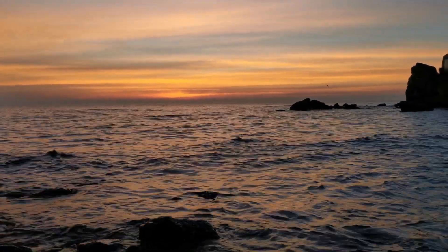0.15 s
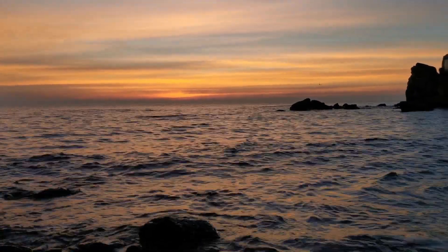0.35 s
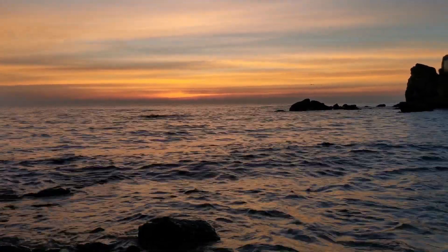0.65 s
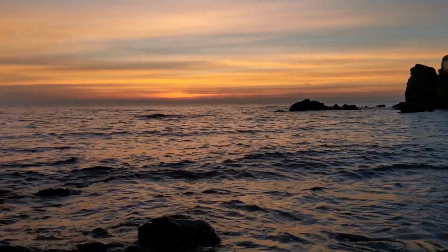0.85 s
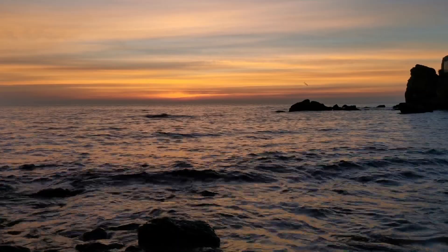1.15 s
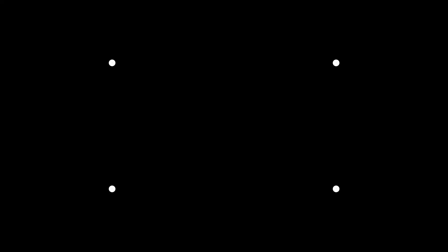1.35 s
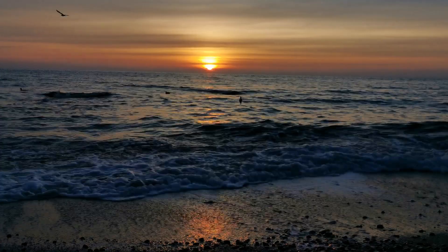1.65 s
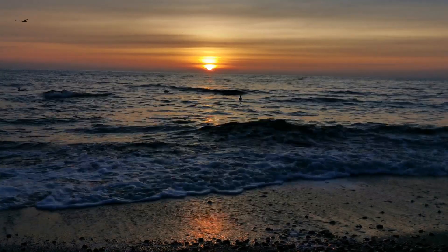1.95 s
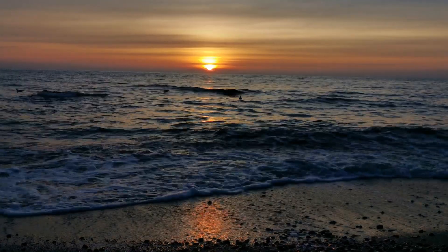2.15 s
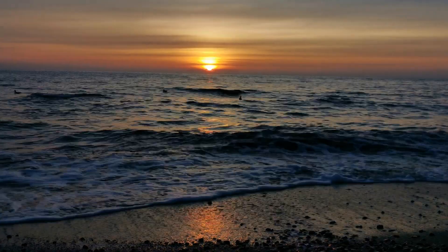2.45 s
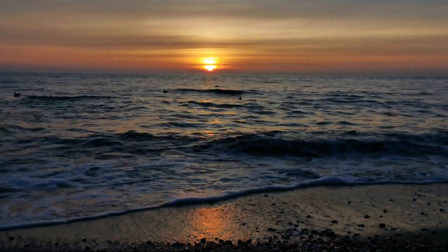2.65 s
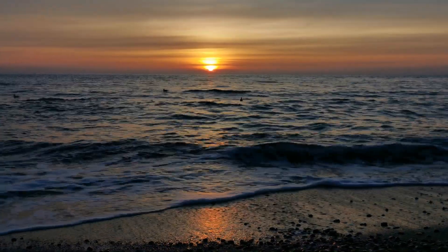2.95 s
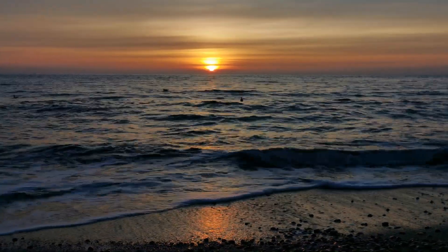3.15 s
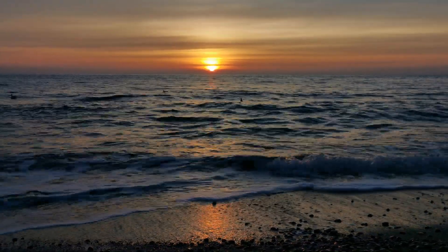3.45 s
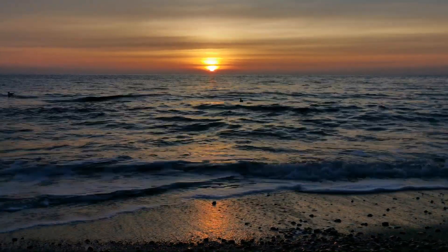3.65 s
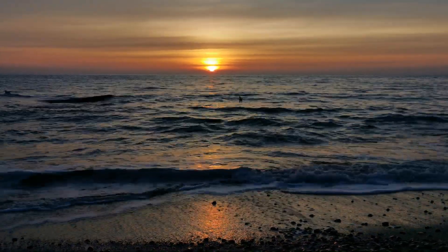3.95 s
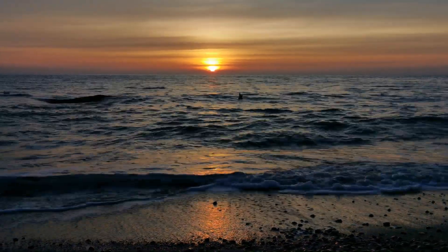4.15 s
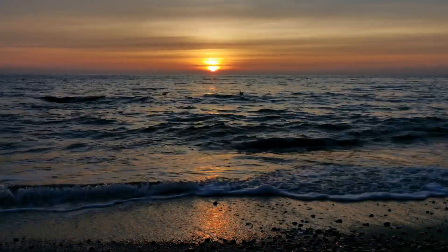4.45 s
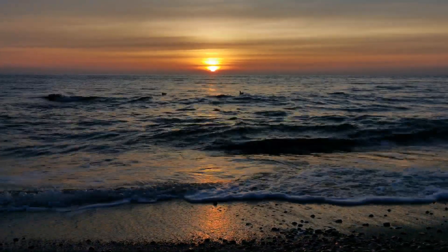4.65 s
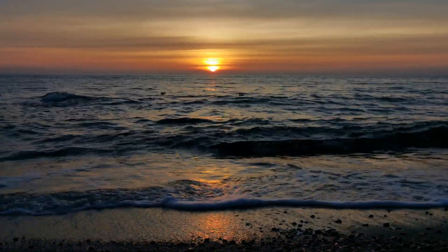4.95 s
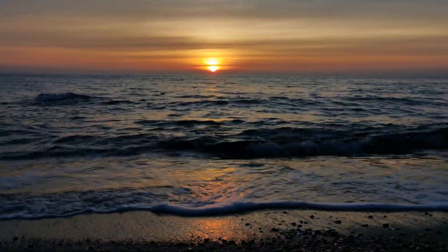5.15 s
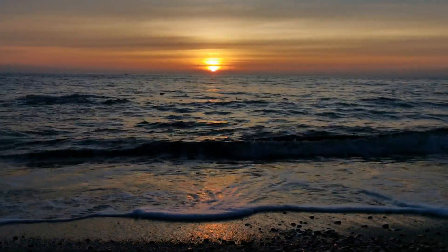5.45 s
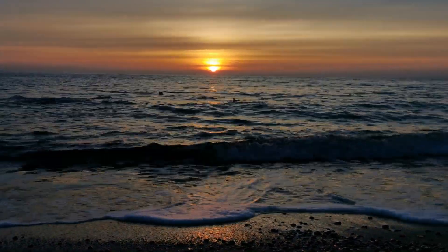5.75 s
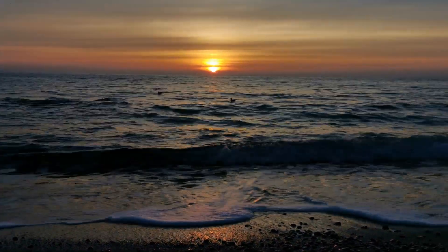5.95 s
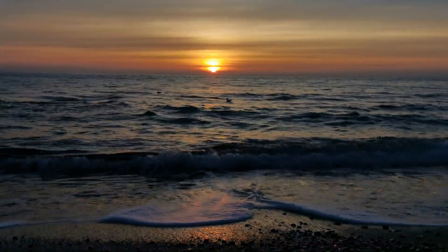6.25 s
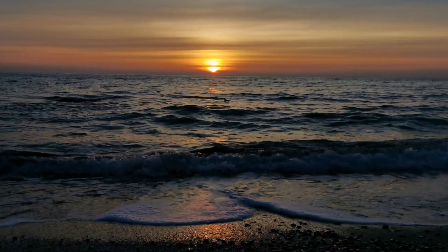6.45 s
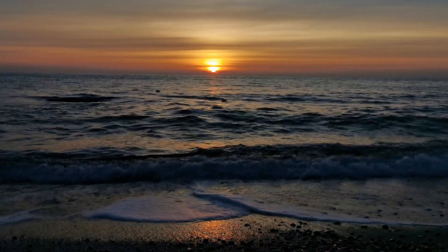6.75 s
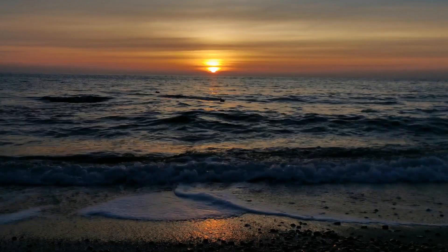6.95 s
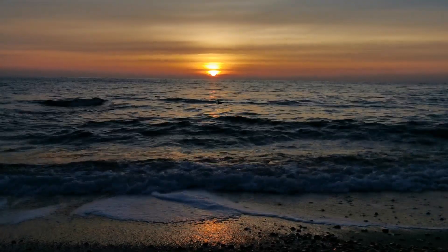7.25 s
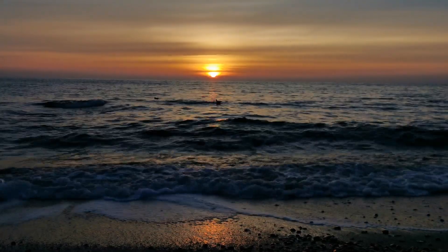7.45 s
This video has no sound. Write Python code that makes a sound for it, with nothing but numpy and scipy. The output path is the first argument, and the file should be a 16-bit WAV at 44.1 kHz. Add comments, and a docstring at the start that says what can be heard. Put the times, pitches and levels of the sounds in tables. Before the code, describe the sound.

Close stereo at the water's edge outdoors. First, wavelets lap among rocks with low hollow gulps, bright trickles and ticking drops. After a very short silence, a sandy, pebbly beach: a hissing wash draws back, a small wave slaps and spills, then larger crests break towards the right with rumble, churn and fizzing foam. A faint distant engine drone and light breeze sit underneath.

```python
"""Seaside, two scenes with a short silence between: small waves lap among rocks, then surf runs on a sandy beach.
At the rocks trapped air gulps and drops tick; on the beach wavelets spill, then larger crests break to the right.
Water is bubbles: noise for countless far ones, single ringing sines for near ones, in a spectrum per source.
Air clouds rumble, smaller bubbles churn, foam fizzes. A wavering sine is a far engine; low noise is a breeze."""
import sys
import numpy as np
from scipy import signal
from scipy.fft import rfft, irfft, next_fast_len
from scipy.io import wavfile
from scipy.ndimage import uniform_filter1d, map_coordinates

SR = 44100
rng = np.random.default_rng(int(sys.argv[2]) if len(sys.argv) > 2 else 0)


def write(x):
    x = np.atleast_2d(x).T
    wavfile.write(sys.argv[1], SR, np.round(np.clip(x, -1, 1) * 32767).astype(np.int16))


N = 334719
PORT_LAG_S = 0.00039  # travel time of sound between the two microphone ports


def amp(db):
    """Gain of a level in dB."""
    return 10 ** (np.asarray(db) / 20)


def unit(pair):
    """A stereo pair scaled so that its centre has rms 1."""
    return pair / np.sqrt(np.mean(pair.mean(0) ** 2) + 1e-20)


def along(points, hz):
    """Interpolate (Hz, value) points on a log axis."""
    f, v = np.transpose(points)
    return np.interp(np.log(hz + 1), np.log(f + 1), v)


def colour(spectrum, hz):
    """Gain of a spectrum in dB, with a second-order roll-off below its first point."""
    return amp(along(spectrum, hz)) * hz ** 2 / (hz ** 2 + spectrum[0][0] ** 2)


def ripple(hz, bumps):
    """Level in dB of a few Gaussian peaks and notches."""
    return sum(db * np.exp(-((hz - centre) / width) ** 2) for centre, width, db in bumps)


def filtered(x, response):
    """x times a response of frequency."""
    m = next_fast_len(N + 8192)
    return irfft(rfft(x, m) * response(np.fft.rfftfreq(m, 1 / SR)), m)[..., :N]


def sides(db):
    """Left and right gains for a left-right level difference, mean power 1."""
    g = amp(np.array([db, -db]) / 2)
    return g / np.sqrt(np.mean(g ** 2, 0))


def wobble(rate_hz):
    """A smooth random curve through normal knots, rate_hz knots a second."""
    knots = rng.standard_normal(int(N * rate_hz / SR) + 4)
    return map_coordinates(knots, [np.arange(N) * rate_hz / SR])


def since(s):
    """Seconds gone by since time s, zero before it."""
    return np.maximum(np.arange(N) / SR - s, 0)


def swell(start, rise, hold, fall):
    """Level in dB of moving water: 20 dB up per rise, 0 over the hold, 20 dB down per fall; slopes run on."""
    to_go = np.maximum(start + rise - np.arange(N) / SR, 0)
    return -20 * (to_go / rise + since(start + rise + hold) / fall)


def together(levels_db):
    """Gain of unrelated sounds heard at once: their powers add."""
    return np.sqrt(sum(amp(np.maximum(db, -120)) ** 2 for db in levels_db))


def add(track, s, sound):
    """Mix a sound into a track at time s."""
    part = track[..., round(s * SR):][..., :sound.shape[-1]]
    part += sound[..., :part.shape[-1]]


def bubble(age, cycles, rise):
    """A bubble at an age in its own cycles: rings, dies by 60 dB, climbs in pitch as it nears the surface."""
    age = np.maximum(age, 0)
    ring = np.sin(2 * np.pi * age * (1 + rise * age / cycles / 2))
    return ring * amp(-60 * age / cycles) * (1 - np.exp(-2 * age))


def rush(patchy_db, alike=0.88):
    """Countless far bubbles: patchy noise from all around, alike at both ports mainly in the bass."""
    z = signal.stft(rng.standard_normal((2, N)), nperseg=1024)[2]
    field = uniform_filter1d(rng.standard_normal(z.shape[1:]), size=4, axis=0)
    field = uniform_filter1d(field, size=4, axis=1)
    pair = signal.istft(z * amp(patchy_db * field / field.std()), nperseg=1024)[1][:, :N]

    def blend(hz):
        # the angle sets the correlation of the ports, which falls as a sinc of frequency
        angle = np.arccos(alike * np.sinc(2 * hz * PORT_LAG_S)) / 2
        return np.array([np.cos(angle), np.sin(angle)])

    mid, side = filtered(pair, blend)
    return unit(np.array([mid + side, mid - side]))


def swarm(lo_hz, hi_hz, cycles, spread_db, count):
    """Near bubbles at random times, strengths and directions, pitches log-uniform between two limits."""
    when, pitch, size, where = rng.random((count, 4)).T[:, :, None]
    hz = lo_hz * (hi_hz / lo_hz) ** pitch
    gain = hz * amp(spread_db * np.minimum(-np.log(1 - size), 4))
    n = np.arange(min(int(SR * (.7 * cycles / lo_hz + PORT_LAG_S)), 3000000 // count))
    index = ((when * N).astype(int) + n).ravel()

    def port(lag):
        age = (hz * (n / SR - lag * PORT_LAG_S)).astype(np.float32)
        return np.bincount(index, (gain * bubble(age, cycles, rise=0.088)).ravel(), N)[:N]

    return unit(np.array([port(where), port(1 - where)]))


def water(spectrum, far, near, near_db):
    """Far and near bubbles together in one colour, at rms 1."""
    return unit(filtered(far + amp(near_db) * near, lambda hz: colour(spectrum, hz)))


def surf():
    """A breaking crest traps rumbling air clouds; they split into churning bubbles and end as fizzing foam."""
    # Bubble spectra. Each row: frequency in Hz, relative level in dB.
    cloud_spectrum = [(35, -36), (60, -4.5), (188, 0), (296, -7.5), (400, -6.5), (520, -7), (880, -120)]
    churn_spectrum = [(200, 3), (340, -7), (450, 0), (800, -1), (1300, -5.5), (2300, -11.5), (3000, -30),
                      (5000, -54)]
    fine_spectrum = [(500, -11), (850, -3.5), (1200, -2), (1600, -1.5), (2300, -13), (3500, -47)]  # churn bubbles once split
    shingle_spectrum = [(500, -19), (950, -14), (1400, -1.5), (2000, 5), (2550, -2), (3300, -6),
                        (4600, -20), (5500, -18), (8000, -57)]
    foam_spectrum = [(1410, -0.5), (2400, -5), (3200, -0.5), (4110, -2), (5950, -8.5), (6790, -6),
                     (8290, -11.5), (14000, -18.5)]
    edge_spectrum = [(3100, -40), (3900, -2), (4450, 1.5), (5200, -23), (9000, -60)]  # fine bubbles at the front of a sheet of water
    # Sheets of water over sand and shingle. Each row: start, rise, hold and fall in seconds, level in dB,
    # leading edge over the sheet in dB.
    sheets = [(1.3, 0.36, 0.12, 1.46, -46.5, -14), (1.7, 0.72, 0.4, 1.1, -56, -17),
              (2.17, 0.16, 0.02, 0.3, -57, -4.5), (3.651, 0.29, 0.03, 0.59, -57.5, -19),
              (4.377, 0.3, 0.17, 0.14, -55, -11.5), (4.7, 0.085, 0.02, 0.14, -54, -8.5),
              (5.018, 0.45, 0.031, 0.78, -46.5, -10), (5.771, 0.39, 1.19, 0.54, -49.5, -8.5),
              (6.78, 0.3, 0.25, 0.45, -53.5, -22)]
    edge_lead_s = 0.085
    foam_trim_db = -4.5

    rumbling, churning, splitting, foaming = crests()
    direction = churning / np.sqrt(np.mean(churning ** 2, 0))  # the swash runs up where the crest fell
    washing = direction * together([db + swell(*shape) for *shape, db, _ in sheets])
    edge_levels_db = [db + edge_db + swell(start - edge_lead_s, rise, hold + edge_lead_s, fall)
                      for start, rise, hold, fall, db, edge_db in sheets]
    leading = direction * together(edge_levels_db)
    tumble = wobble(35)  # the crest falls in small lumps

    far, near = rush(0.0, alike=0.98), swarm(107.4, 424, cycles=10.7, spread_db=0, count=2000)
    cloud = water(cloud_spectrum, far, near, near_db=-17)
    far, near = rush(1.4, alike=1.0), swarm(315, 2760, cycles=13, spread_db=1.5, count=6000)
    coarse = water(churn_spectrum, far, near, near_db=-16)
    fine = water(fine_spectrum, far, near, near_db=-14)
    churn = churning * coarse + splitting * fine
    far, near = rush(1.0), swarm(1028, 5320, cycles=31, spread_db=3.5, count=8000)
    swash = water(shingle_spectrum, far, near, near_db=-10.5)
    far, near = rush(1.8), swarm(2540, 17300, cycles=9.1, spread_db=2, count=14000)
    foam = water(foam_spectrum, far, near, near_db=-8.5)
    far, near = rush(2.0), swarm(3430, 5260, cycles=22, spread_db=2, count=4000)
    edge = water(edge_spectrum, far, near, near_db=-6)

    breaking = rumbling * cloud + amp(0.5 * tumble) * churn
    breaking += foaming * amp(foam_trim_db + 0.33 * tumble) * foam
    return breaking + washing * swash + leading * edge


def crests():
    """Left and right gains of air cloud, coarse churn, fine churn and foam: all crests swell by one rule."""
    # Breaking crests. Each row: start, rise, hold and fall in seconds, churn in dB, air cloud over churn in dB,
    # foam over churn in dB (before surf's foam trim and drain), left-right difference in dB.
    breakers = [(1.295, 0.26, 0.26, 0.29, -45, -2.5, -3, -0.5), (1.55, 0.34, 0.98, 0.96, -51, 3, -3.5, -1),
                (3.202, 0.38, 0.07, 0.29, -49.5, -0.5, -7.5, 0.5),
                (3.225, 0.47, 0.22, 0.81, -53, -1, -7.5, -2.5), (4.427, 0.31, 0.17, 0.12, -50, -1, -18, -2),
                (4.828, 0.61, 0.22, 0.7, -43, -2.5, 1.5, -1.5),
                (5.372, 0.47, 0.25, 0.7, -41.5, 0, -1.5, -5.5), (5.844, 0.49, 0.31, 1.5, -40, -3, -1.5, -6),
                (6.496, 0.41, 0.44, 0.45, -42.5, -5, -3, -5)]
    # Spray off a toppling lip. Each row: start in seconds, level in dB before surf's foam trim, fall in seconds.
    sprays = [(3.264, -56.5, 0.36), (4.398, -58, 0.13), (4.63, -51.5, 0.035), (5.03, -60, 0.4),
              (5.15, -52.5, 0.3), (5.313, -48, 0.03)]
    spray_rise_s, spray_hold_s = 0.005, 0.009
    calm_cloud_db, calm_churn_db, calm_foam_db, calm_side_db = -62.5, -61, -74, -1  # between crests
    cloud_drain_db_per_s, churn_drain_db_per_s, foam_drain_db_per_s = 3.5, 3.5, 1.5  # from full height on
    fine_churn_db, split_s = -8.5, 0.43  # split bubbles over the churn, and the time they need to form

    spray_levels_db = [db + swell(s, spray_rise_s, spray_hold_s, fall) for s, db, fall in sprays]
    calm = sides(np.array([calm_side_db]))
    calm_gains = (amp(calm_cloud_db), amp(calm_churn_db), 0, together([calm_foam_db] + spray_levels_db))
    power = [(gain * calm) ** 2 for gain in calm_gains]
    for start, rise, hold, fall, db, cloud_db, foam_db, side_db in breakers:
        level_db, age_s = db + swell(start, rise, hold, fall), since(start + rise)
        cloud = amp(level_db + cloud_db - cloud_drain_db_per_s * age_s)
        coarse = amp(level_db - churn_drain_db_per_s * age_s)  # used up as it splits
        fine = amp(level_db + fine_churn_db) * np.minimum(age_s / split_s, 1)
        foam = amp(level_db + foam_db - foam_drain_db_per_s * age_s)
        pan = sides(np.array([side_db]))
        power = [p + (gain * pan) ** 2 for p, gain in zip(power, (cloud, coarse, fine, foam))]
    return np.sqrt(power)


def rocks():
    """Wavelets slosh in a hollow and lap between the stones, and water trickles off them."""
    # Water spectra. Each row: frequency in Hz, relative level in dB.
    slosh_spectrum = [(40, -12), (80, -13), (112, -18), (156, 1), (184, 0), (225, -9), (400, -15),
                      (800, -50), (2000, -100)]  # low ring of a hollow between stones
    lap_spectrum = [(180, -33.5), (300, 7), (372, -0.5), (483, 3.5), (531, 3), (610, -0.5), (1020, 0.5),
                    (2800, -13.5), (3640, -53), (6160, -120)]
    trickle_spectrum = [(1350, 1.5), (2300, -1), (2980, -9.5), (3350, -7), (4140, -9.5), (4850, -3.5),
                        (5450, -11.5), (6580, -17.5), (7880, -22), (9150, -18.5), (10800, -16.5),
                        (12600, -21.5), (13300, -35), (14400, -65), (15000, -51)]
    # Colour of the two ports. Each row: frequency in Hz, left-right difference in dB.
    port_sides = [(150, 0), (700, -0.2), (1300, -1.5), (2300, -3), (2900, -0.5), (3700, 1.5), (4300, -1),
                  (5200, -12.5), (6000, -8.5), (7200, 1), (9000, 16), (11000, 11), (12800, 2.5)]
    # Water surging into the hollow. Each row: start, rise, hold and fall in seconds, level in dB.
    surges = [(0.094, 0.12, 0.11, 0.045, -48), (0.29, 0.054, 0.06, 0.16, -43.5)]
    # Wavelets on the stones. Each row: start in seconds, lapping in dB, trickle in dB before the trim.
    wavelets = [(-0.02, -51.5, -71), (0.075, -53.5, -57.5), (0.16, -50, -56.5), (0.275, -47, -60),
                (0.449, -58, -54.5), (0.6, -56.5, -61.5), (0.775, -66, -59), (0.88, -57.5, -71),
                (1.1, -62, -62), (1.25, -57.5, -67)]
    lap_rise_s, lap_hold_s, lap_fall_s, trickle_fall_s = 0.02, 0.014, 0.36, 0.15
    ripple_slosh_db, ripple_lap_db, ripple_trickle_db = -62, -57, -60.5  # between wavelets; trickle before trim
    trickle_trim_db = 2.5

    slosh_ripple_db = ripple_slosh_db + 3.5 * wobble(15)
    sloshing = together([slosh_ripple_db] + [db + swell(*shape) for *shape, db in surges])
    lap_levels_db = [db + swell(s, lap_rise_s, lap_hold_s, lap_fall_s) for s, db, _ in wavelets]
    lapping = together([ripple_lap_db] + lap_levels_db) * amp(1.5 * wobble(32))
    trickle_levels_db = [db + swell(s, lap_rise_s, lap_hold_s, trickle_fall_s) for s, _, db in wavelets]
    trickling = together([ripple_trickle_db] + trickle_levels_db) * amp(trickle_trim_db + 1.2 * wobble(45))

    far, near = rush(1.9, alike=0.96), swarm(124.5, 269, cycles=18, spread_db=2, count=700)
    slosh = water(slosh_spectrum, far, near, near_db=-9.5)
    far, near = rush(1.0), swarm(340.7, 2197, cycles=51, spread_db=2, count=2500)
    lap = water(lap_spectrum, far, near, near_db=-12.5)
    far, near = rush(2.0), swarm(2260, 12700, cycles=16, spread_db=3.5, count=9000)
    trickle = water(trickle_spectrum, far, near, near_db=-8)
    mix = sloshing * slosh + lapping * lap + trickling * trickle
    return filtered(mix + drops(), lambda hz: sides(along(port_sides, hz)))


def slaps():
    """A small crest falls on the water: a bright splash over the hollow burst of the air it traps."""
    # Crests slapping down. Each row: start in seconds, splash in dB, body in dB, decay by 60 dB in seconds.
    blow_rows = [(0.287, -49, -61, 0.16), (0.314, -58, -48, 0.13), (0.355, -46, -54, 0.18),
                 (0.961, -41, -46, 0.053), (1.04, -51, -51, 0.11), (1.145, -54.5, -57, 0.1),
                 (3.3, -53.5, -63, 0.5), (3.385, -52, -70, 0.5), (3.435, -55, -62, 0.39),
                 (3.491, -52, -49, 0.34), (3.565, -53, -43.5, 0.25), (3.61, -55, -48, 0.2),
                 (3.664, -49, -54, 0.22), (3.704, -50, -44.5, 0.18), (3.815, -46, -41.5, 0.14),
                 (3.873, -55, -47, 0.07), (4.642, -40, -58, 0.08), (4.659, -40, -58, 0.05),
                 (4.699, -42, -51, 0.13), (4.754, -49, -48, 0.17), (4.785, -49, -45, 0.23),
                 (4.858, -47, -54, 0.21), (4.897, -41, -51, 0.07), (5.72, -50, -42, 0.36),
                 (5.855, -52, -36, 0.17), (5.924, -37, -43, 0.16), (5.968, -50, -37.5, 0.31),
                 (6.2, -47, -46, 0.36), (6.47, -44, -52, 0.4), (6.535, -46, -39, 0.17),
                 (6.72, -44, -51, 0.27), (7.11, -44, -46.5, 0.25)]
    # Spectra of the two parts. Each row: frequency in Hz, relative level in dB.
    splash_spectrum = [(450, -18.5), (750, 2), (1100, 4), (1800, -20.5), (6500, -23), (13000, -46)]
    body_spectrum = [(200, -2.5), (330, 2), (480, -1), (700, -12.5), (1100, -27), (3000, -61)]
    attack_s = 0.0041

    blows, t = np.zeros((2, N)), np.arange(SR // 2) / SR
    for s, splash_db, body_db, decay_s in blow_rows:
        envelope = amp(-60 * t / decay_s) * (1 - np.exp(-t / attack_s))
        add(blows, s, amp([[splash_db], [body_db]]) * envelope)
    far, near = rush(0.9), swarm(300, 3080, cycles=10, spread_db=0, count=5000)
    splash = water(splash_spectrum, far, near, near_db=-4)
    body = water(body_spectrum, far, near, near_db=-4)
    return blows[0] * splash + blows[1] * body


def gulps():
    """A pocket of air swells into a pulse as it closes, climbs in pitch as it rises, sheds four small bubbles."""
    # Air pockets closing under water. Each row: start in seconds, peak in dB, pitch in Hz, life in cycles,
    # swell in seconds, pitch climb over the life as a fraction.
    pockets = [(0.092, -48.5, 546, 110, 0.0084, 0), (0.123, -36, 150, 30, 0.01, 0.03),
               (0.126, -46, 390, 27, 0.0066, 0.3), (0.172, -39, 170, 27, 0.01, 0.83),
               (0.182, -43, 273, 15, 0.0027, 0.1), (0.203, -37, 158.4, 36, 0.035, 0.01),
               (0.309, -41, 385, 55, 0.0062, 0.02), (0.352, -31, 177, 35, 0.013, 0.06),
               (0.372, -44, 364, 58, 0.009, 0.05), (0.405, -40, 162.4, 29, 0.013, 0.04),
               (0.43, -50.5, 420, 64, 0.01, 0.5), (0.482, -49.5, 248, 31, 0.0086, 0.04),
               (0.518, -48, 170, 26, 0.012, 0.15), (0.525, -50.5, 559, 70, 0.008, 0.07),
               (0.662, -51, 185, 18, 0.01, 0.25), (0.72, -44.5, 244, 32, 0.0081, 0.7),
               (0.875, -51, 140, 12, 0.006, 0), (0.91, -51.5, 176, 16, 0.008, 0.4),
               (0.995, -53, 160, 16, 0.008, 0.2), (1.03, -51, 215, 14, 0.005, 0.2),
               (1.06, -45, 423, 24, 0.0036, 0.23), (1.127, -43, 486, 22, 0.0024, 0.1),
               (1.148, -50, 597, 50, 0.005, 0.03), (1.186, -52, 320, 19, 0.0036, 0.2),
               (1.308, -35, 385, 17, 0.0044, 0), (1.311, -32.5, 500, 18, 0.0036, 0.15),
               (3.267, -34, 193, 19, 0.012, 0.07), (3.478, -39, 135, 18, 0.014, 0.02),
               (3.524, -40.5, 191, 18, 0.008, 0.08), (3.552, -39.5, 174, 18, 0.009, 0.15),
               (3.602, -37.5, 464, 57, 0.008, 0.07), (3.665, -41.5, 227, 18, 0.008, 0),
               (4.542, -43, 144, 18, 0.0085, 0.2), (4.629, -34.5, 198, 14, 0.0043, 0.1),
               (4.681, -40.5, 160, 23, 0.0088, 0.16), (4.752, -34.5, 391, 11, 0.003, 0.04),
               (4.797, -39, 224, 27, 0.0074, 0), (4.884, -42, 491, 22, 0.004, 0.1),
               (5.165, -41.5, 169, 22, 0.017, 0.13), (5.897, -29, 186, 25, 0.01, 0.01),
               (5.922, -27.5, 178, 11, 0.0056, 0.2), (6.375, -44, 205, 22, 0.0073, 0.23),
               (6.533, -40, 245, 13, 0.004, 0.2)]

    out, t = np.zeros(N), np.arange(SR // 3) / SR
    for s, db, hz, cycles, swell_s, climb in pockets:
        pocket = bubble(hz * t, cycles, climb) * (1 - np.exp(-(t / swell_s) ** 2))
        late, smaller = rng.random((2, 4, 1))
        shed = bubble((330 + 300 * smaller) * (t - 0.03 * late), cycles=17, rise=.1).sum(0)
        add(out, s, amp(db) * (pocket / np.abs(pocket).max() + amp(-16.5) * shed))
    return out * sides(np.array([-1.2]))


def thuds():
    """The weight of a falling lip gives one low push that dies within a few cycles."""
    # Thuds on the shore. Each row: start in seconds, peak in dB, pitch in Hz.
    pushes = [(3.316, -40.5, 110), (3.435, -46, 81), (3.525, -42, 115), (3.578, -40, 88),
              (4.628, -42.5, 105), (5.512, -41, 87), (6.63, -46, 95)]
    swell_cycles, life_cycles = 1.26, 7.9

    out, t = np.zeros(N), np.arange(SR // 4) / SR
    for s, db, hz in pushes:
        push = bubble(hz * t, life_cycles, rise=0) * (1 - np.exp(-(hz * t / swell_cycles) ** 2))
        add(out, s, amp(db) * push / np.abs(push).max())
    return out


def drops():
    """Each drop falling back among the rocks patters on the surface while its small bubble rings."""
    # Falling drops. Each row: start in seconds, patter in dB before halving and attack, bubble in dB before
    # its attack, pitch in Hz, life in cycles.
    drop_rows = [(0.0977, -50, -49, 4650, 60), (0.1052, -43, -46, 4680, 80), (0.186, -44, -44, 4750, 110),
                 (0.2743, -45, -46, 4800, 70), (0.2977, -54, -43, 5100, 110), (0.3262, -49, -50, 4730, 70),
                 (0.434, -44, -47, 6100, 60), (0.4723, -45, -49, 4970, 90), (0.48, -43, -48, 5000, 90),
                 (0.608, -54, -47, 4600, 80), (0.647, -55, -50, 5000, 60), (0.6823, -50, -46, 5310, 60),
                 (0.8041, -46, -39, 5300, 85), (0.813, -44, -37, 4100, 45), (0.8334, -45.5, -44, 4380, 60),
                 (0.9615, -48, -36, 3280, 65), (0.9625, -47, -37.5, 5360, 100),
                 (1.0645, -52, -40, 4950, 80), (1.1278, -42, -42, 2600, 35), (1.1802, -45, -46, 4880, 50),
                 (1.292, -45.5, -49, 4970, 70), (1.392, -46, -50, 4930, 60)]
    # Patter spectrum. Each row: frequency in Hz, relative level in dB.
    patter_spectrum = [(1800, -7), (3000, -1), (4900, 1.5), (6500, -6.5), (8000, -9), (11000, -6.5),
                       (12800, -12), (14000, -35)]
    patter_rise_s, patter_fall_s = 0.0011, 0.035

    rings, pattering, t = np.zeros((2, N)), np.zeros(N), np.arange(SR // 12) / SR
    for s, patter_db, bubble_db, hz, cycles in drop_rows:
        add(pattering, s, amp(patter_db - 60 * t / patter_fall_s) * (1 - np.exp(-t / patter_rise_s)))
        lag_s = PORT_LAG_S * rng.random((2, 1))
        add(rings, s, amp(bubble_db) * bubble(hz * (t - lag_s), cycles, rise=0.05))
    patter = unit(filtered(rng.standard_normal((2, N)), lambda hz: colour(patter_spectrum, hz)))
    return rings + pattering * patter / 2


def sea(db=-59):
    """The even murmur of surf further along the shore: far bubbles only."""
    # Open sea spectrum. Each row: frequency in Hz, relative level in dB.
    sea_spectrum = [(53, -44), (90, 6), (337, -16), (754, -2), (987, -13), (2120, -4.5), (2600, -6.5),
                    (4020, -13), (12500, -22), (16200, -79), (22000, -120)]
    murmur = unit(filtered(rush(2.0), lambda hz: colour(sea_spectrum, hz)))
    return amp(db) * murmur * sides(np.array([-2.5]))


def engine(hz=73.4):
    """A far engine: only its firing note carries, slightly unsteady in pitch and level."""
    phase = 2 * np.pi * np.cumsum(hz * (1 + 0.012 * wobble(6.2))) / SR
    return amp(-63.5 + wobble(6)) * np.sqrt(2) * np.sin(phase)


def breeze(steady_db=-65.5):
    """Light air brushes the ports as low noise, with a few soft puffs."""
    # Buffeting spectrum. Each row: frequency in Hz, relative level in dB.
    buffet_spectrum = [(15, -7.5), (30, -20), (50, -14), (90, -8.5), (250, -29), (600, -92)]
    # Puffs of air. Each row: start, rise, hold and fall in seconds, level in dB.
    puffs = [(0.0, 0.16, 0.1, 0.12, -55), (0.328, 0.064, 0.05, 0.1, -54), (4.266, 0.15, 0.032, 0.1, -58)]
    air = filtered(rush(0.0, alike=0.87), lambda hz: amp(along(buffet_spectrum, hz)))
    return together([steady_db] + [db + swell(*shape) for *shape, db in puffs]) * unit(air)


def ports(hz):
    """The two port openings colour each side of the beach differently."""
    # Peaks and notches of each port. Each row: centre in Hz, width in Hz, level in dB.
    left_bumps = [(1820, 170, -9), (6360, 2000, -2.5), (9060, 440, 4.5), (11050, 580, 4.5)]
    right_bumps = [(2260, 220, 3), (3210, 73, -8.5), (4040, 370, 3), (4730, 140, 4.5), (6760, 490, 2.5),
                   (9260, 1220, -6.5)]
    # Balance of the ports. Each row: frequency in Hz, left-right difference in dB.
    port_sides = [(60, 3.5), (200, -1.5), (700, -0.5), (1280, -5), (2370, 2), (3200, -1), (5500, 1.5),
                  (8050, -1.5), (14000, 3)]
    return amp([ripple(hz, left_bumps), ripple(hz, right_bumps)]) * sides(along(port_sides, hz))


def turning(pair):
    """The left port's colour shifts as the backwash ahead gives way to crests on the right."""
    # Left port colour for sound from ahead. Each row: centre in Hz, width in Hz, level in dB.
    ahead_bumps = [(1250, 180, -3), (2090, 300, -6), (4350, 300, 0), (6450, 1200, 2)]
    turn_end_s, turn_s = 3.47, 0.3

    left, right = pair
    ahead = np.clip((turn_end_s - np.arange(N) / SR) / turn_s, 0, 1)
    shifted = filtered(left, lambda hz: amp(ripple(hz, ahead_bumps)))
    return np.array([ahead * shifted + (1 - ahead) * left, right])


def scene():
    """The rocks, a short silence, then the beach."""
    rocks_end_s, beach_start_s = 1.414, 1.609
    t = np.arange(N) / SR
    at_rocks = amp(-np.maximum(t - rocks_end_s, 0) * 1800)  # fades at 1800 dB/s
    at_beach = np.clip((t - beach_start_s) / .004, 0, 1)
    slapping = slaps()
    beach = turning(filtered(surf() + slapping + sea(), ports)) + thuds() + engine()
    both = gulps() + breeze()
    return at_rocks * (rocks() + slapping) + at_beach * beach + (at_rocks + at_beach) * both


def record(dry):
    """A steep low-pass: almost nothing is kept above the band limit."""
    top_hz = 14400
    return filtered(dry, lambda hz: 1 / (1 + (hz / top_hz) ** 60))


dry = scene()
out = record(dry)
write(out)
```